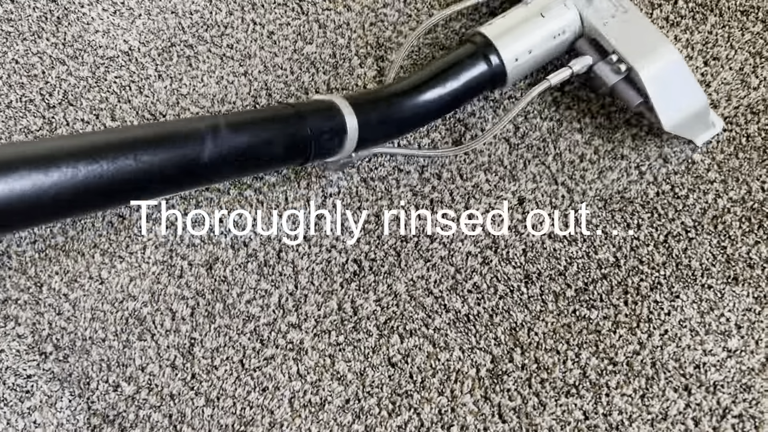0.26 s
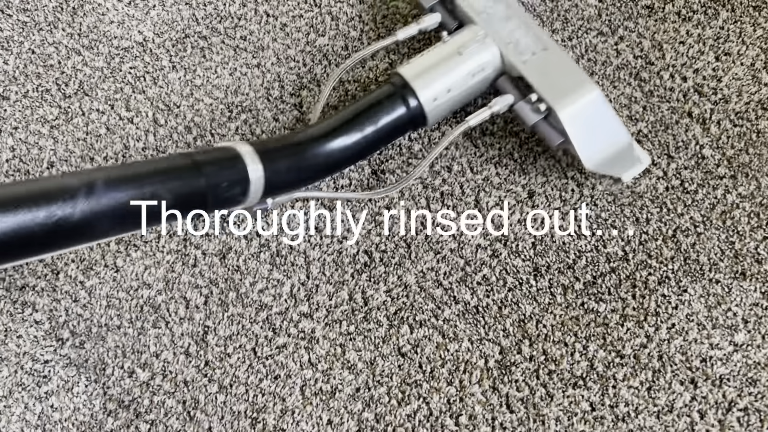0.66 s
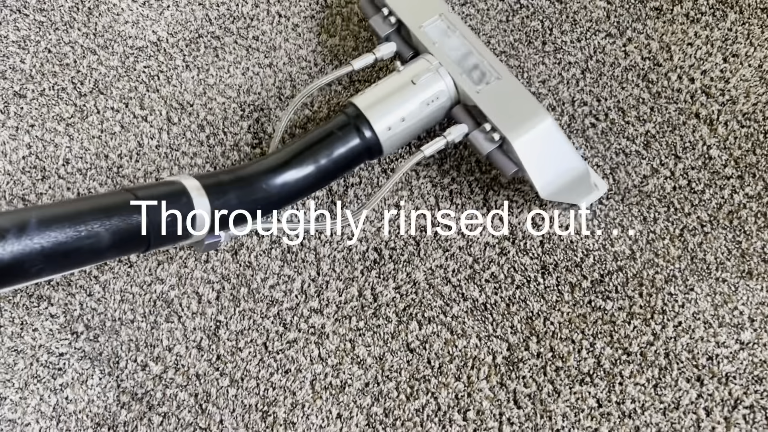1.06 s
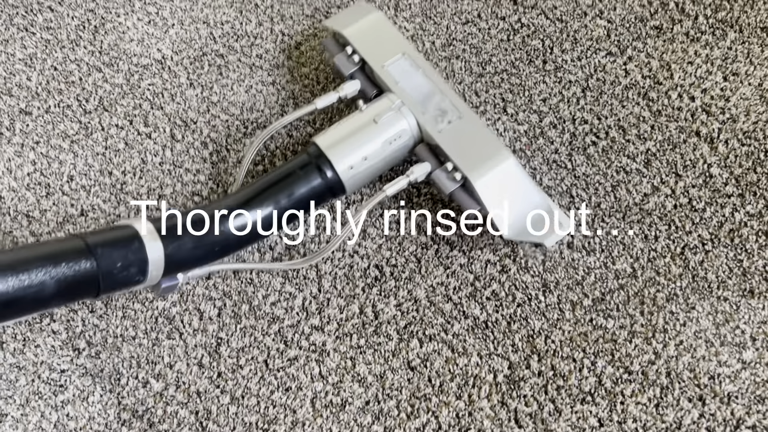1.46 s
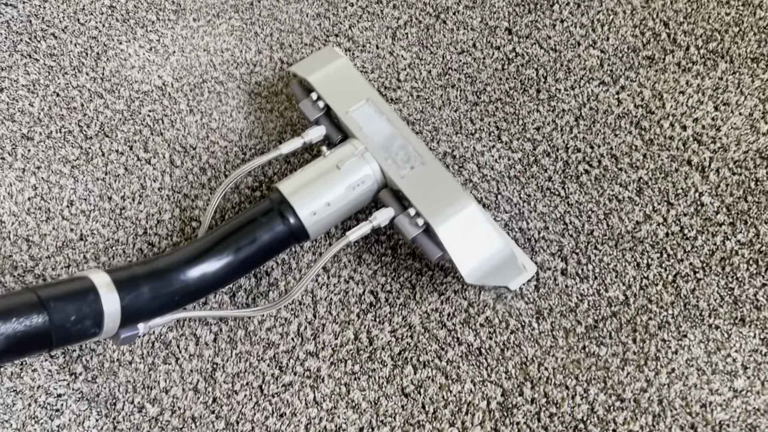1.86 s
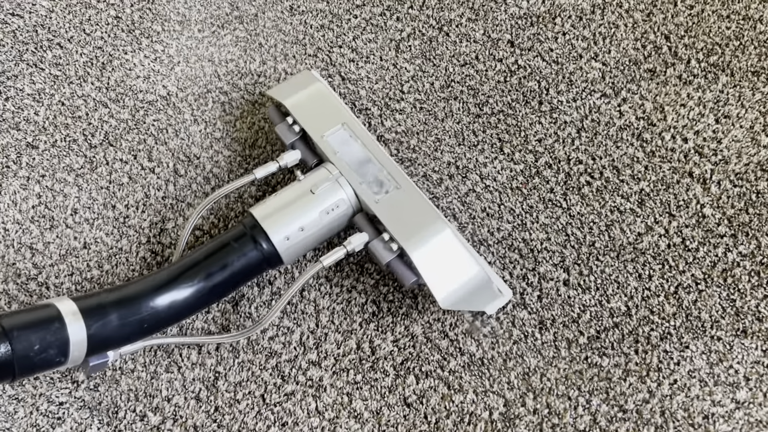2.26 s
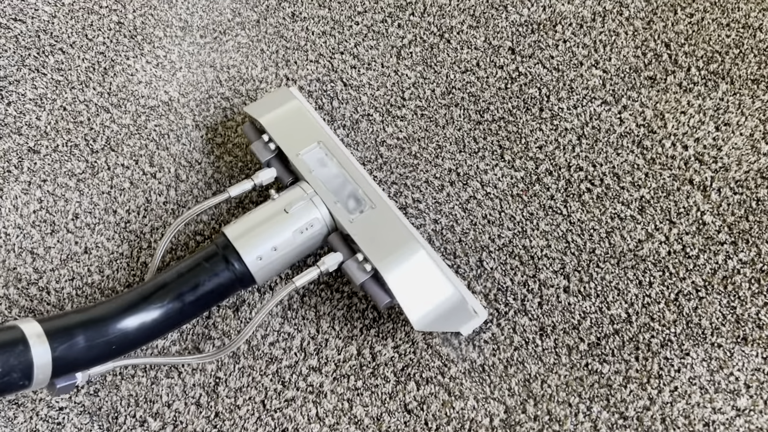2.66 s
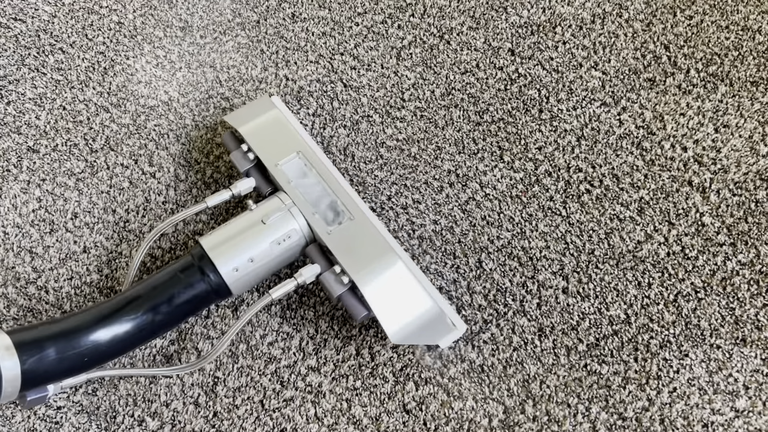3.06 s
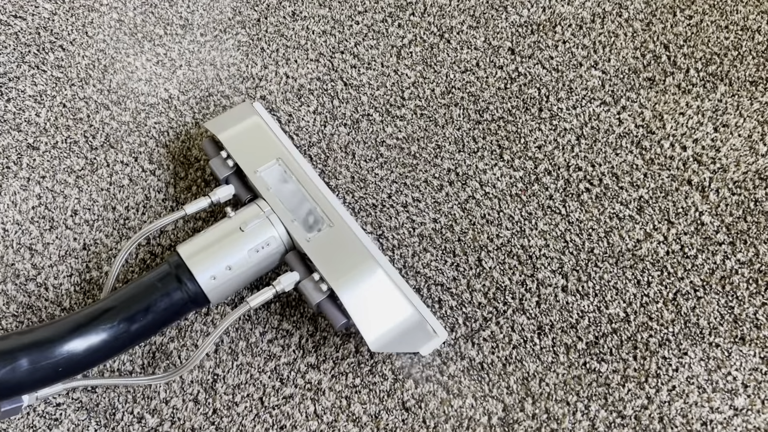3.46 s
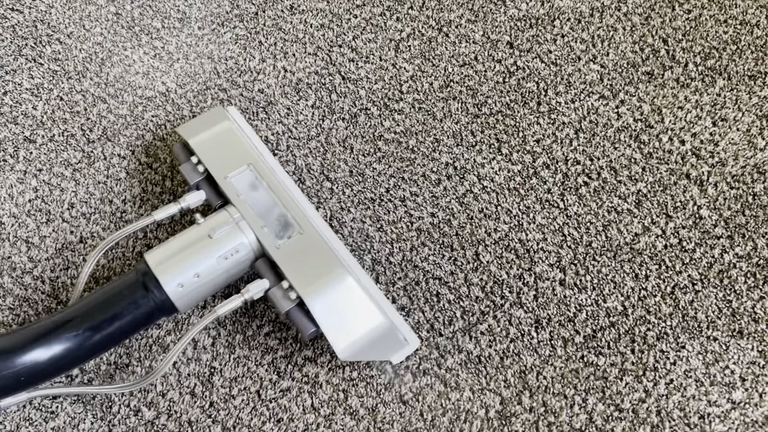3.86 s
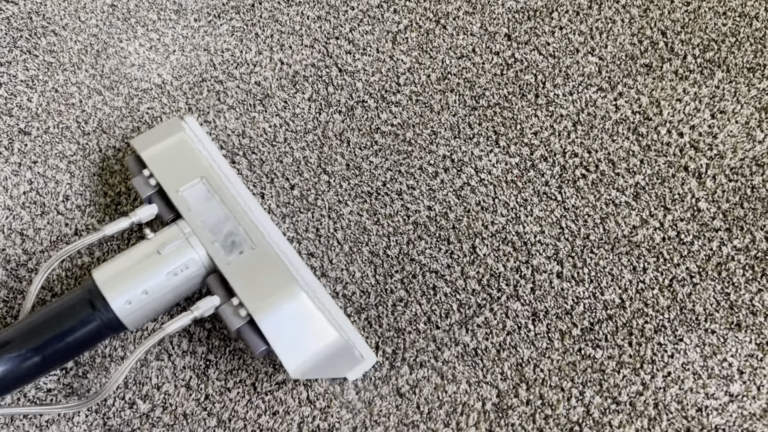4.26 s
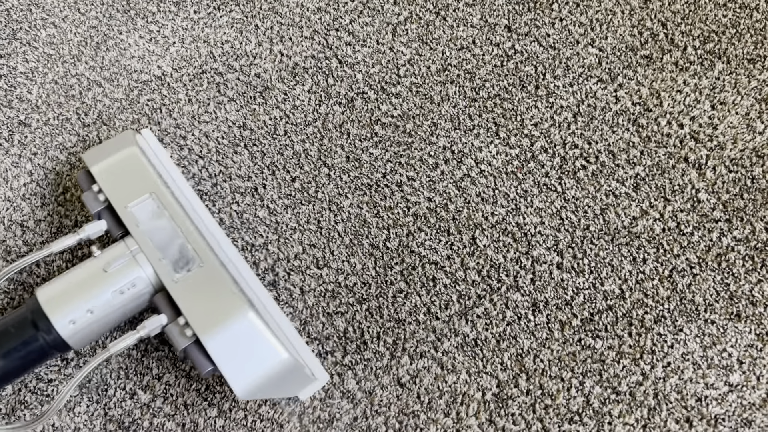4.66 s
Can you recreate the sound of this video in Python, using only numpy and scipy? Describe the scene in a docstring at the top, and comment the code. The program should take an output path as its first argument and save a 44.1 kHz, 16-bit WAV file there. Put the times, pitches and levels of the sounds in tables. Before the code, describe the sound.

Continuous wet vacuum noise fills the stretch, grainy and broad, growing for three seconds and then nearly levelling. Water jets hiss brightly above it, while a smooth low pump hum and noisy motor tones sit behind. The hose sings faintly early on; later the suction flutters and chokes briefly. A soft floor drag and low hoots close the stroke. The stereo microphone is close, in a carpeted room.

```python
"""A carpeted room: an extractor wand is drawn slowly towards a hand-held stereo microphone.
Closest is the suction slot, filtered noise that roars, rings the hose and shifts between the ears;
two jets add a fine hiss, and the head's drags on the floor are bursts of low noise.
Wavering tones make the hose's weak whistle and the lip's two hoots as the stroke ends.
Behind them the water pump hums on a few harmonics and the vacuum motor adds narrow noisy tones."""
import sys
import numpy as np
from scipy import signal
from scipy.fft import rfft, irfft, next_fast_len
from scipy.io import wavfile
from scipy.ndimage import map_coordinates

SR = 44100
rng = np.random.default_rng(int(sys.argv[2]) if len(sys.argv) > 2 else 0)


def waveform_to_disk(signal):
    """Save audio, clipped to [-1, 1], as 16-bit WAV at the path in sys.argv[1]."""
    frames = np.transpose(np.atleast_2d(signal))
    scaled = np.clip(frames, -1, 1) * 32767
    samples = np.round(scaled).astype(np.int16)
    wavfile.write(sys.argv[1], SR, samples)


N = 216485
TIME = np.arange(N) / SR  # seconds
FREQ = np.arange(N // 2 + 1) * SR / N  # Hz
TOP_HZ = 15750  # upper limit of the jets' hiss and of the recorder


def undb(db):
    """Decibels to gain."""
    return 10 ** (np.asarray(db) / 20)


def unit(x):
    """Scale to an rms of one."""
    return x / np.sqrt(np.mean(x ** 2))


def spectra(table):
    """The columns of a frequency table, joined on a log axis."""
    hz, *columns = np.transpose(table)
    return np.array([np.interp(np.log(FREQ + 1), np.log(hz), column) for column in columns])


def shaped(x, gain):
    """Filter by a gain for each frequency."""
    return irfft(rfft(x) * gain, N)


def lowpass(cutoff_hz, order):
    """Gain that falls away smoothly above a cutoff, where it is one half."""
    return 1 / (1 + (FREQ / cutoff_hz) ** order)


def walk(rate):
    """Smooth chance with an rms of one, changing about `rate` times a second."""
    size = next_fast_len(N, real=True)
    hz = np.arange(size // 2 + 1) * SR / size
    spectrum = rfft(rng.standard_normal(size)) * np.exp(-(hz / rate) ** 2)
    return unit(irfft(spectrum, size)[:N])


def delayed(x, ms):
    """Read a sound late by a fixed or moving time."""
    return map_coordinates(x, [np.arange(N) - ms * SR / 1000], order=3, mode="nearest")


def panned(pair, db):
    """Make the left ear `db` louder than the right."""
    return np.array([pair[0] * undb(db / 2), pair[1] * undb(-db / 2)])


def partly_alike(direct, share_table):
    """Keep a share of the direct pair's power and fill the rest with separate noise at each ear."""
    share = np.clip(spectra(share_table), 0, 1)
    scattered = rng.standard_normal((2, N))
    return shaped(direct, np.sqrt(share)) + shaped(scattered, np.sqrt(1 - share))


def grained(x, grain_db, width_hz, life_s, size=2048):
    """Let narrow bands of a noise swell and sink, each for a moment; rms one."""
    hz, s, bands = signal.stft(x, SR, nperseg=size)
    cells = rng.standard_normal((size, size // 16))
    places = np.meshgrid(hz / width_hz, s / life_s, indexing="ij")
    field = map_coordinates(cells, places, order=1, mode="mirror")
    textured = bands * undb(grain_db * unit(field))
    return unit(signal.istft(textured, SR, nperseg=size)[1][:, :N])


def narrow_tone(hz, width_hz):
    """A resonance fed by turbulence: its strength and phase wander."""
    phase = 2 * np.pi * np.cumsum(hz * np.ones(N)) / SR
    return walk(width_hz) * np.cos(phase) + walk(width_hz) * np.sin(phase)


def envelope(start, length, attack, release):
    """Attack, hold and release, from nought to one."""
    return np.clip(np.minimum((TIME - start) / attack, (start + length - TIME) / release), 0, 1)


def crest(at, rise, fall):
    """Decibels that climb to nought at one moment, then sink; a negative fall climbs on."""
    return np.minimum(rise * (TIME - at), fall * (at - TIME))


def swells(table):
    """Decibels of a row of smooth, bell-shaped swells and dips."""
    return sum(db * np.cos(np.pi * np.clip((TIME - s) / length, -.5, .5)) ** 2
               for s, length, db in table)


def lead():
    """Milliseconds by which the left ear leads, faster and faster as the wand approaches."""
    return -0.003 + 0.023 * TIME + 0.003 * TIME ** 2


def far(approach_s=0.78):
    """How far off the wand still is, decaying from one towards nought."""
    return np.exp(-TIME / approach_s)


# Share of the slot's noise that both ears hear alike. Each row: frequency in Hz, share from 0 to 1.
SLOT_ALIKE = [(100, 1), (300, 0.9), (700, 0.69), (1300, 0.66), (2500, 0.83), (3300, 0.61), (4200, 0.37),
              (5500, 0.18)]
# Phase between the microphone ports. Each row: frequency in Hz, phase in radians.
PORT_PHASE = [(100, -0.04), (700, -0.44), (1700, -1.25), (3000, -0.0047), (4200, 0.6), (5500, -1.35)]


def slot_turbulence():
    """Air breaks up in the slot: one noise reaches both ears with a moving lead, partly scattered."""
    source = rng.standard_normal(N)
    left = shaped(source, np.exp(1j * spectra(PORT_PHASE)[0]))
    return partly_alike(np.array([left, delayed(source, lead())]), SLOT_ALIKE)


# Slugs of water in the hose. Each row: middle in seconds, length in seconds, lift in dB.
WATER_SLUGS = [(.2, 0.6, 2), (1.38, 0.22, 1.5), (1.85, 0.56, 0.5), (3.8, 0.15, 5.5)]


def slug_gurgle():
    """Slugs of water gurgle up the hose and lift its noise, in dB."""
    return 1 + swells(WATER_SLUGS)


# The lip rides over the pile. Each row: middle in seconds, length in seconds, change in dB.
LIP_RIDES = [(.28, 0.53, -1), (1.3, .35, 0.2), (3.3, 0.26, -2), (3.6, 0.24, 2.2), (3.75, 0.19, -0.5),
             (3.94, 0.2, -2.5), (4.08, 0.13, 1), (4.47, .1, 1), (4.6, 0.19, -1), (4.88, .16, 0.5)]
SLOT_BEND_S, SLOT_BEND_DB = 3.06, 1.0
SLOT_RISE_DB_PER_S, SLOT_LATE_RISE_DB_PER_S = 0.81, 0.2


def slot_stroke():
    """The slot's rush grows, then more slowly, and swells or chokes at the lip, in dB."""
    growth_db = crest(SLOT_BEND_S, SLOT_RISE_DB_PER_S, -SLOT_LATE_RISE_DB_PER_S)
    return SLOT_BEND_DB + growth_db + swells(LIP_RIDES)


# Colour of the suction noise. Each row: frequency in Hz, left and right relative levels in dB.
SUCTION_COLOUR = [(28, -100, -100), (50, -71, -71), (110, -66.5, -63.5), (275, -63, -63), (470, -60.5, -60),
                  (910, -55.5, -55.5), (1080, -59.5, -56.5), (1360, -59, -55.5), (1520, -60, -60.5),
                  (1650, -62.5, -58.5), (2410, -59, -54.5), (3040, -61, -58), (3630, -62, -62),
                  (4140, -60, -60.5), (4400, -60, -65.5), (4930, -59, -64), (5530, -62, -72),
                  (5570, -61, -76), (7060, -62.5, -66.5), (12000, -105, -110)]
# Standing waves in the hose and wand. Each row: frequency in Hz, width in Hz, lift in dB.
HOSE_WAVES = [(172, 10, 5.5), (226, 13, 4), (247.7, 10, 5), (313, 36, 4), (407, 10, 0.5), (444, 31, 5),
              (485, 16, 2.5), (516, 11, 4.5), (579, 10, 8), (642, 30, 3.5), (707, 12, 4), (1257, 100, 2.5),
              (1710, 52, 5.5), (1860, 130, 1.5)]
SUCTION_DB = -24.5  # before the changes in each band
BODY_HZ, HOSE_HZ, EDGE_HZ = 288, 950, 3700  # where the body, hose and slot bands give way
BODY_DB, EDGE_DB, EDGE_FAR_DB = 2, -2.5, -4  # the fine hiss is weaker while the wand is far off


def suction(gurgle_db, slot_db, flutter_db=1.0):
    """Air tears water out of the pile: the slot roars, and the hose rings below it."""
    standing_db = sum(db / (1 + (2 * (FREQ - hz) / width) ** 2) for hz, width, db in HOSE_WAVES)
    coloured = shaped(slot_turbulence(), undb(spectra(SUCTION_COLOUR) + standing_db))
    rush = grained(coloured, grain_db=1.4, width_hz=60, life_s=.08)
    hose = shaped(rush, lowpass(HOSE_HZ, 6))
    edge = shaped(rush, 1 - lowpass(EDGE_HZ, 12))  # fine hiss above the roar
    slot = rush - hose - edge
    body = shaped(hose, lowpass(BODY_HZ, 8))  # the slugs leave this steady
    ringing = (hose - body) * undb(gurgle_db + flutter_db * walk(28))
    roar = slot * undb(slot_db + flutter_db * walk(23))
    hiss = edge * undb(EDGE_DB + EDGE_FAR_DB * far())
    return undb(SUCTION_DB) * (body * undb(BODY_DB) + ringing + roar + hiss)


CAVITY_HZ, CAVITY_SAG_HZ_PER_S = 2694, 78
CAVITY_CREST_S, CAVITY_RISE_DB_PER_S, CAVITY_FALL_DB_PER_S = 3, 3, 0.5
CAVITY_DB = -35.5  # at the crest, before the stroke's own changes


def slot_resonance(slot_db, width_hz=390, pan_db=-5, diffuse=0.53):
    """The nozzle's cavity colours the roar with a broad peak that sinks as the head tilts."""
    hz = CAVITY_HZ - CAVITY_SAG_HZ_PER_S * TIME
    db = CAVITY_DB + crest(CAVITY_CREST_S, CAVITY_RISE_DB_PER_S, CAVITY_FALL_DB_PER_S)
    direct = narrow_tone(hz, width_hz)
    ears = (direct, delayed(direct, lead()))
    heard = np.array([ear + diffuse * narrow_tone(hz, width_hz) for ear in ears])
    return panned(unit(heard), pan_db) * undb(db + slot_db)


# Colour of the jets' hiss. Each row: frequency in Hz, relative level in dB.
SPRAY_COLOUR = [(2500, -76), (5400, -71), (7000, -68), (8400, -64.8), (10000, -69), (11300, -62.6),
                (12700, -63.5), (14000, -64.6), (14800, -63.8), (16000, -66.5)]
# Share of the hiss that both ears hear alike. Each row: frequency in Hz, share from 0 to 1.
SPRAY_ALIKE = [(6000, .45), (8600, .6), (9600, .99), (10600, .99), (11500, .78), (13300, .9), (15000, .72)]
SPRAY_DB, SPRAY_LAG_MS = -29.5, 0.1489  # level before the stroke's changes; lag of the left ear
SPRAY_CREST_S, SPRAY_RISE_DB_PER_S, SPRAY_FALL_DB_PER_S = 1.4, 1.13, 0.48
SPRAY_START_DB, SPRAY_BUILD_S = -0.5, 0.38  # the jets take a moment to reach full pressure


def spray(surge_db=0.74):
    """Two jets, as one noise, atomise water in a hiss that reaches the right ear first."""
    stroke_db = crest(SPRAY_CREST_S, SPRAY_RISE_DB_PER_S, SPRAY_FALL_DB_PER_S)
    build_db = SPRAY_START_DB * np.clip(1 - TIME / SPRAY_BUILD_S, 0, 1)
    mist = rng.standard_normal(N)
    heard = partly_alike(np.array([delayed(mist, SPRAY_LAG_MS), mist]), SPRAY_ALIKE)
    coloured = shaped(heard, undb(spectra(SPRAY_COLOUR)) * (FREQ < TOP_HZ))
    hiss = grained(coloured, grain_db=1.9, width_hz=55, life_s=.035)  # a fine-grained hiss
    return hiss * undb(SPRAY_DB + stroke_db + build_db + surge_db * walk(22))


# Colour of the rumble under the head. Each row: frequency in Hz, relative level in dB.
RUMBLE_COLOUR = [(20, -41), (55, 9), (110, 5), (220, 6), (400, -2), (1000, -39)]
# The head is set down and shifted. Each row: start in seconds, length in seconds, level in dB.
HEAD_DRAGS = [(-.04, 0.32, -33), (0.43, 0.22, -44), (4.707, 0.18, -40)]


def rumble(attack_s=0.034, release_s=0.13):
    """The wand's head drags heavily on the floor: bursts of low noise, alike at both ears."""
    weight = sum(undb(db) * envelope(start, length, attack_s, release_s)
                 for start, length, db in HEAD_DRAGS)
    return unit(shaped(rng.standard_normal(N), undb(spectra(RUMBLE_COLOUR)[0]))) * weight


def air_tone(hz, rough, width_hz, waver_hz=3):
    """Air locks on to a standing wave: a clean tone, and a rough share that differs between the ears."""
    pitch = hz + waver_hz * walk(32.0)
    rough = np.clip(rough, 0, 1)
    clean = np.sqrt(2 * (1 - rough)) * np.sin(2 * np.pi * np.cumsum(pitch) / SR)
    ears = [clean + np.sqrt(rough) * narrow_tone(pitch, width_hz) for _ in range(2)]
    return unit(np.array(ears))


# One long note from the hose: clear at first, briefly clear again near 1.9 s, mostly sunk in the rush.
# Each row: time in seconds, pitch in Hz, level in dB, left minus right in dB, roughness from 0 to 1.
WHISTLE_PATH = [(0, 848, -35.5, -2, 0.34), (.2, 845, -33, -4, .25), (.33, 848.5, -32.5, 6, 0.3),
                (.4, 858, -37, 7, 0.4), (.72, 852, -38.5, -4, .6), (.87, 867, -38, -11, .7),
                (1.08, 838, -38, -11, 0.41), (1.4, 839, -41, -10, 0.6), (1.68, 853, -42, -7, .6),
                (1.88, 865, -32.5, -2, 0.12), (2.0, 859, -43, -4, 0.7), (2.7, 860, -39, -1, 0.63),
                (3.3, 857, -50, -4, .7), (3.6, 845, -48, 5, .8), (4.9, 845, -41, 6, .8)]
OCTAVE_DB, OCTAVE_FADE_DB_PER_S = -40.5, 4.5  # level at the start


def whistle(width_hz=18, octave_width_hz=20, octave_rough=0.27):
    """Air over the hose's ribs sings one wavering note with a thin, fading octave."""
    at, *columns = np.transpose(WHISTLE_PATH)
    hz, db, pan_db, rough = (np.interp(TIME, at, column) for column in columns)
    note = air_tone(hz, rough, width_hz) * undb(db)
    octave_db = OCTAVE_DB - OCTAVE_FADE_DB_PER_S * TIME
    octave = air_tone(2 * hz, octave_rough, octave_width_hz) * undb(octave_db)
    return panned(note, pan_db) + octave


# The lip hoots as the stroke ends. Each row: start in seconds, length in seconds, pitch in Hz,
# level in dB, left minus right in dB, roughness from 0 to 1.
LIP_HOOTS = [(4.72, 0.19, 635, -37, -14, .3), (4.715, 0.17, 211, -35.5, 3, 0.15)]


def hoots(width_hz=15, attack_s=0.035, release_s=0.08):
    """Short, low air tones at the lip as the stroke ends."""
    out = 0
    for start, length, hz, db, pan_db, rough in LIP_HOOTS:
        tone = panned(air_tone(hz, rough, width_hz), pan_db)
        out = out + tone * undb(db) * envelope(start, length, attack_s, release_s)
    return out


# Harmonics of the pump's hum. Each row: multiple of the pump's rate, relative level in dB,
# share of the hum's fading that it follows (1 is the whole, more exaggerates it).
PUMP_HARMONICS = [(1, -10.5, 0.8), (2, 2, 1.5), (3, -32.5, 1)]
PUMP_HZ, PUMP_WANDER_HZ, PUMP_DB = 75.0, 0.19, -25.5  # overall level
# slow fade and one step down, before each harmonic's share
PUMP_FADE_DB_PER_S, PUMP_STEP_S, PUMP_STEP_LENGTH_S, PUMP_STEP_DB = 0.25, 3.94, 0.17, -2


def pump(waver_db=0.22, lag_ms=0.096):
    """Two pressure pulses a turn, one a little stronger, make a smooth hum, later at the right ear."""
    hz = PUMP_HZ + PUMP_WANDER_HZ * walk(2.7)
    phase = 2 * np.pi * np.cumsum(hz) / SR
    step = np.clip((TIME - PUMP_STEP_S) / PUMP_STEP_LENGTH_S + .5, 0, 1)
    fade_db = PUMP_STEP_DB * step - PUMP_FADE_DB_PER_S * TIME
    hum = 0
    for multiple, db, share in PUMP_HARMONICS:
        wave = np.sin(round(multiple) * phase + rng.uniform(0, 2 * np.pi))
        hum = hum + undb(db + share * fade_db) * wave
    hum = unit(hum) * undb(PUMP_DB + waver_db * walk(11))
    return np.array([hum, delayed(hum, lag_ms)])


# Narrow noisy tones of the vacuum motor and its housing, some swelling in or fading.
# Each row: frequency in Hz, width in Hz, level in dB, change in dB while the wand is far off,
# fading in dB per second.
MOTOR_TONES = [(101.7, 4, -50, 0, 0), (358.3, 14, -40.5, -3.5, 1.05), (795, 17, -34, -19, 1.8),
               (1574, 17, -44.5, -5, 0.5)]


def motor(diffuse=0.33):
    """The vacuum motor's narrow noisy tones, partly scattered by the room."""
    out = 0
    for hz, width, db, far_db, fade in MOTOR_TONES:
        direct = narrow_tone(hz, width)
        ears = np.array([direct + diffuse * narrow_tone(hz, width) for _ in range(2)])
        out = out + undb(db + far_db * far() - fade * TIME) * unit(ears)
    return out


def scene():
    """The wand's suction, spray, drags and whistles over the pump and motor."""
    slot_db = slot_stroke()
    wand = suction(slug_gurgle(), slot_db) + slot_resonance(slot_db) + spray() + rumble()
    return wand + whistle() + hoots() + pump() + motor()


def record(dry):
    """The recorder cuts the top steeply."""
    return signal.sosfilt(signal.ellip(10, .1, 80, TOP_HZ, fs=SR, output="sos"), dry)


dry = scene()
out = record(dry)
waveform_to_disk(out)
```